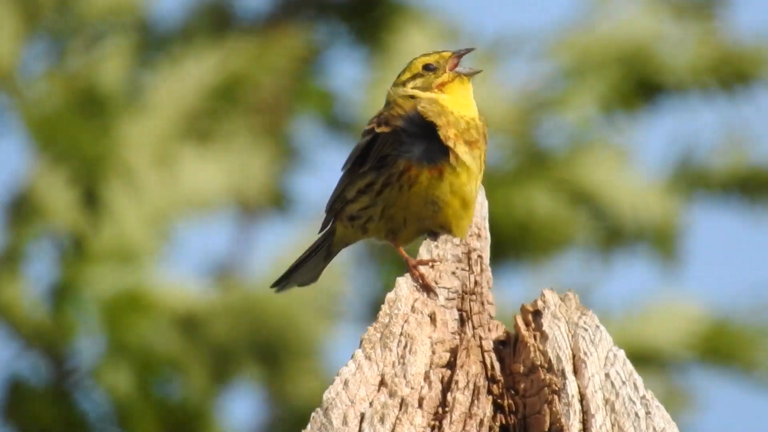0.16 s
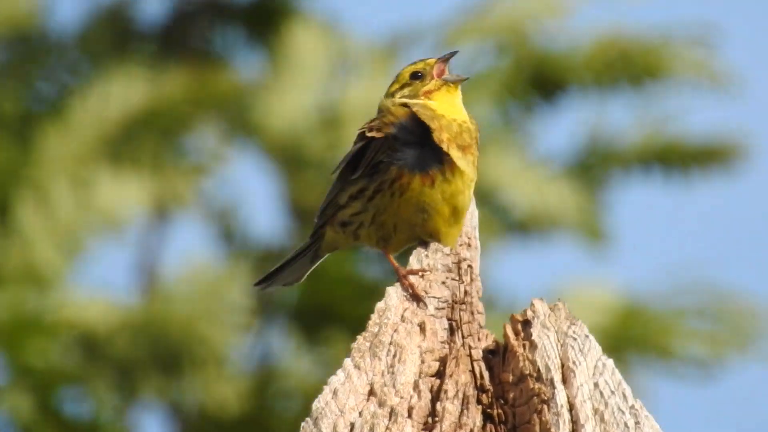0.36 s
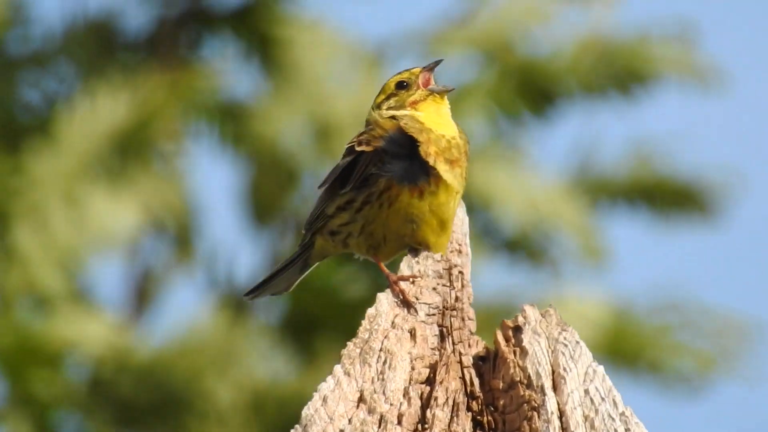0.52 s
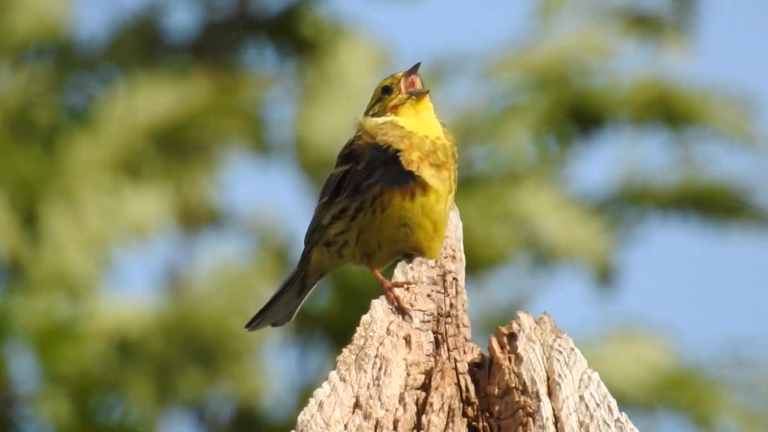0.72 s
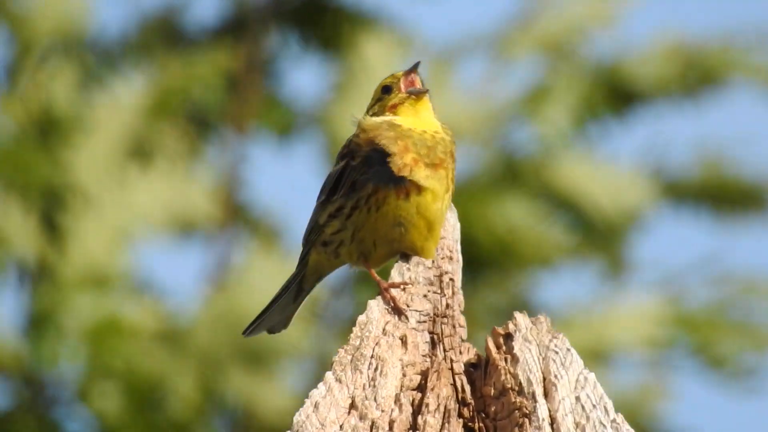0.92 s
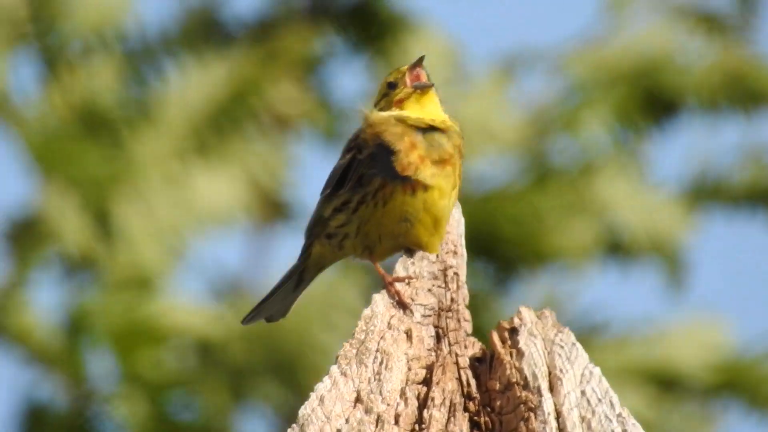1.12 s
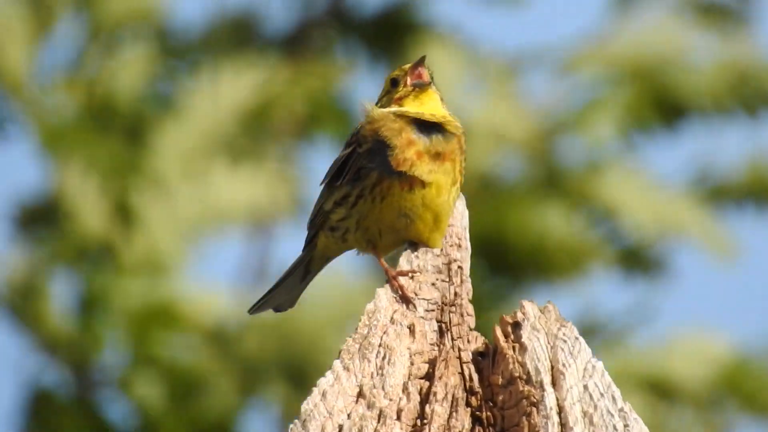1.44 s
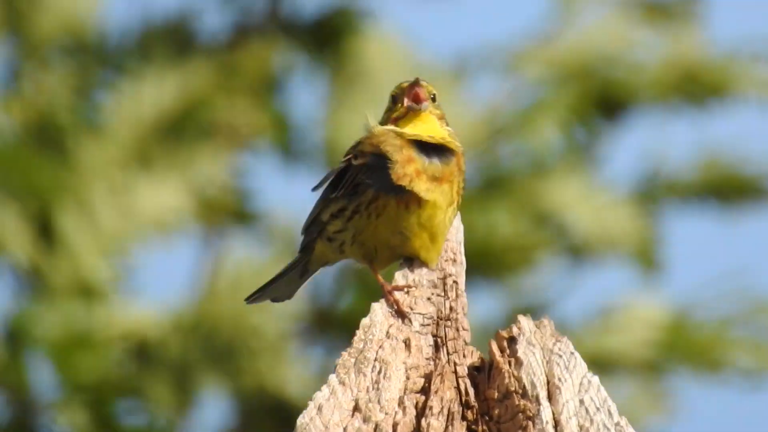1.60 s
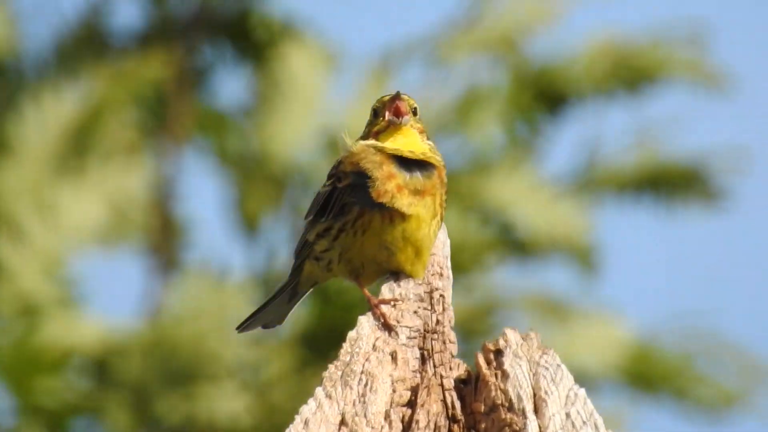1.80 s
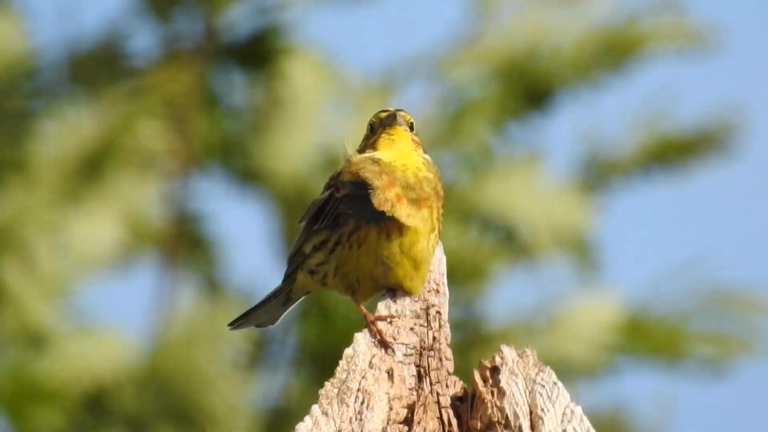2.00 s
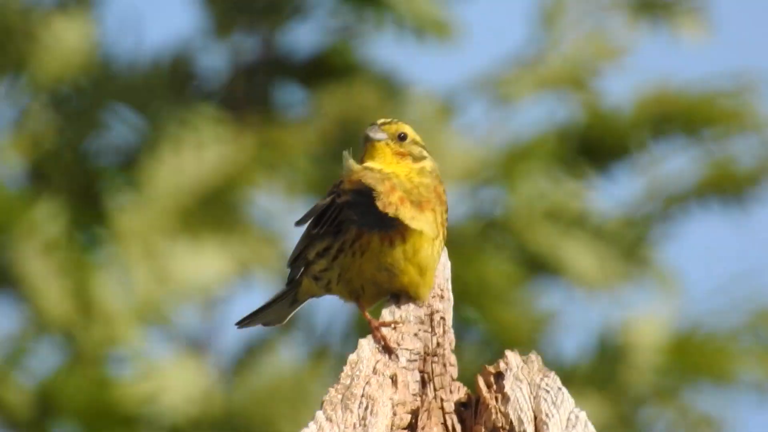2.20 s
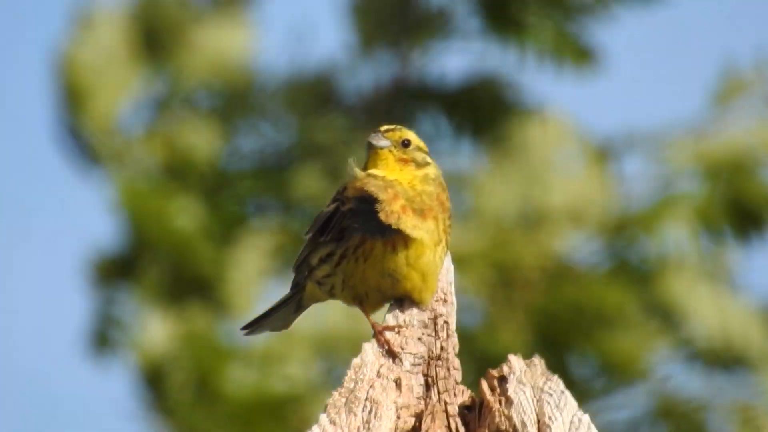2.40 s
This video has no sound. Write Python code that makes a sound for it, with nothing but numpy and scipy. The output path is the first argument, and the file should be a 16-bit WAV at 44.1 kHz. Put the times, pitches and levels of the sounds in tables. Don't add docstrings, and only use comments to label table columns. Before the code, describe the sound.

A bunting sings at once: eight pairs, one every 0.18 seconds, each a high fast rattle capped by a sharp chip, then a lower trill of upward flicks, swelling until about 1.4. From 1.46 to 2.0 a long buzz grows and sinks. Short echoes follow the notes. Behind lie breezy hum, throbbing crickets and low wind, easing then returning near 2.3; faint far chirps, mostly after 1.8.

```python
import sys
import numpy as np
from scipy import signal
from scipy.fft import rfft, irfft
from scipy.io import wavfile
from scipy.ndimage import uniform_filter1d, map_coordinates

SR = 44100
rng = np.random.default_rng(int(sys.argv[2]) if len(sys.argv) > 2 else 0)


def persist_wave(psi):
    counts = np.round(np.clip(psi, -1, 1) * 32767).astype(np.int16)
    wavfile.write(sys.argv[1], SR, np.atleast_2d(counts).T)


def natural_amplitude(level_db):
    exponent = np.asarray(level_db, float) / 20
    return 10 ** exponent


N = 112454
t = np.arange(N) / SR

# chip peak t/s, chip level/dB, rattle pitch f/Hz, rattle level over chip/dB
RATTLES = [
    (.006, -35.5, 6420, -25),
    (0.186, -36, 6550, -7),
    (0.374, -34, 6510, -1),
    (.554, -27.5, 6520, -7.5),
    (0.741, -27, 6495, -7.5),
    (0.923, -23, 6510, -11.5),
    (1.109, -25, 6560, -6.5),
    (1.296, -21, 6577, -8),
]


def level(x, db):
    return x * natural_amplitude(db) / np.sqrt(np.mean(x ** 2))


def band(x, hz, width_hz):
    f = np.arange(N // 2 + 1) * SR / N
    bell = np.exp(-.5 * ((f - hz) / width_hz * 2) ** 2)
    return irfft(rfft(x) * bell, N)


def noise(*shape):
    return rng.standard_normal((*shape, N))


def walk(rate_hz):
    return level(band(noise(), 0, rate_hz), 0)


def ramp(x, width):
    return np.sin(np.pi / 2 * np.clip(x / width, 0, 1)) ** 2


def whistle(hz, size, octave_db=-51):
    phase = 2 * np.pi * np.cumsum(hz) / SR
    return size * (np.sin(phase) + natural_amplitude(octave_db) * np.sin(2 * phase))


def countryside():
    # f/Hz, level per Hz/dB
    colour = np.array([(15, -47), (25, -36.5), (210, -3.5), (247, -4), (586, -14), (902, -8), (1350, -14),
                       (4200, -16.5), (15700, -28)])
    # f/Hz, left-right difference over the middle/dB
    spread = np.array([(60, -14.5), (110, -1.5), (200, -6), (380, -2.5), (700, -6.5), (1290, -4),
                       (2380, -1), (4400, -5), (8120, -0.5), (15000, -3.5)])
    read = lambda rows, hz: np.interp(np.log(hz), np.log(rows[:, 0]), rows[:, 1])
    out, swell = 0, walk(4.5)
    for hz in 25 * 2 ** np.arange(0, 9.6, .5):
        mid, side = band(noise(2), hz, hz * 0.51)
        flicker_db = (0.2 * swell + 2.3 * walk(15)) * min(900 / hz, 1)
        wide = natural_amplitude(read(spread, hz)) * side * np.array([[1], [-1]])
        out = out + natural_amplitude(read(colour, hz) + flicker_db) * (mid + wide)
    out = out * natural_amplitude(-56.5) / np.std(band(out.mean(axis=0), 1300, 4500))
    steady_hum = level(band(noise(), 881, 110), -70)
    return out + steady_hum


def wind():
    # t/s, level/dB
    gusts = [
        (0., -64),
        (.6, -68),
        (.75, -78.5),
        (2.1, -89),
        (2.3, -68),
        (2.55, -68),
    ]
    rumble = level(band(noise(2) + 0.27 * noise(), 58, 50), 0)
    return rumble * natural_amplitude(np.interp(t, *np.array(gusts).T) + 1.8 * walk(6))


def crickets():
    # t/s, level/dB
    chorus = [
        (0., -52.5),
        (.3, -55),
        (1.0, -56),
        (1.5, -52.5),
        (2.02, -52),
        (2.12, -51),
        (2.25, -63),
        (2.34, -55),
        (2.42, -51.5),
        (2.55, -64.5),
    ]
    pulse_hz = 33 * (1 + .15 * walk(10.4))
    throb = 3.3 + np.sin(2 * np.pi * np.cumsum(pulse_hz) / SR)
    throb = throb * natural_amplitude(1.6 * walk(44))
    wings = level(band(noise(2), 4910, 500) * throb, 0)
    return wings * natural_amplitude(np.interp(t, *np.array(chorus).T))


def rattles():
    length_s, warble_hz, swing_hz = 0.049, 239.3, 330
    chip_s, chip_up_hz, chip_rise_hz = 0.0039, 300, 566
    out = 0
    for at, db, hz, rel_db in RATTLES:
        u = t - at
        turn = 2 * np.pi * warble_hz * u + 0.28 * walk(60)
        swell_db = 9.5 * np.clip(u, -1, 0) / length_s
        size = natural_amplitude(db + rel_db + swell_db + 2.0 * walk(170))
        size = size * ramp(u + length_s, 0.015) * ramp(-u, 0.0026)
        size = size * (1 + .45 * np.cos(turn - 1.2))
        swing = swing_hz * ramp(u + length_s + 0.0059, .017) * np.sin(turn)
        out = out + whistle(hz + swing + 40 * walk(150), size)
        chip_hz = hz + chip_up_hz + chip_rise_hz * np.tanh(u / chip_s / 2)
        out = out + whistle(chip_hz, natural_amplitude(db) * np.exp(-.5 * (u / chip_s * 2.1) ** 2))
    return band(out, 6620, 1460)


def trills():
    # last flick t/s, time between flicks/s, level/dB, pitch f/Hz, upward sweep/Hz
    trill_rows = [
        (0.0936, 0.012, -34.5, 5275, 700),
        (0.2836, 0.012, -27.5, 5230, 620),
        (0.4683, .0128, -22.5, 5178, 520),
        (0.6548, 0.013, -20.5, 5154, 360),
        (0.8388, 0.012, -20, 5161, 338),
        (1.02, 0.013, -19.5, 5139, 280),
        (1.2085, .0124, -17.5, 5142, 330),
        (1.398, .0114, -24, 5125, 280),
    ]
    tick_dbs = (-93, -88, -46.5, -54, -50, -56.5, -75, -50.5)
    out = 0
    for (last, period, db, hz, sweep_hz), chip, tick_db in zip(trill_rows, RATTLES, tick_dbs):
        since = t - chip[0] - 0.0065
        cycle = ((t - last) / period + .5 + 0.039 * walk(25)) % 1
        swell_db = -27.5 * np.exp(-np.maximum(since, 0) / 0.022)
        last_db = -2 * ramp(t - last + period, period)
        size = natural_amplitude(db + swell_db + .9 * walk(60) + last_db)
        size = size * np.sin(np.pi * cycle) ** max(sweep_hz / 300, 1.05)
        size = size * ramp(since, 0.0021) * (t < last + period / 2)
        out = out + whistle(hz + sweep_hz * (cycle - .5) + 15 * walk(120), size)
        tick = np.exp(-.5 * ((t - last - period * 0.1) / 0.0014) ** 2)
        out = out + natural_amplitude(tick_db) * tick * level(band(noise(), 6260, 2300), 0)
    return out


def far_chirps():
    # start t/s, length/s, from f/Hz, to f/Hz, level/dB
    chirp_rows = [
        (0.235, 0.016, 3150, 3350, -67),
        (1.254, 0.04, 3100, 4160, -57.5),
        (1.831, 0.019, 3000, 3930, -49),
        (2.093, 0.011, 3100, 3720, -60),
        (2.115, 0.025, 3900, 3700, -56),
        (2.143, 0.0066, 4000, 4500, -51),
        (2.3, .025, 3800, 4530, -57),
        (2.312, 0.015, 3100, 3800, -55.5),
        (2.38, .032, 3100, 4540, -51),
        (2.41, .014, 3200, 3920, -54.5),
    ]
    out = 0
    for at, length, from_hz, to_hz, db in chirp_rows:
        u = np.clip((t - at) / length, 0, 1)
        out = out + whistle(from_hz + (to_hz - from_hz) * u, natural_amplitude(db) * np.sin(np.pi * u))
    return out


def buzz():
    # t/s, level/dB, middle pitch f/Hz, pitch swing/Hz
    course = [
        (1.465, -64, 6350, 150),
        (1.491, -49.5, 6520, 352),
        (1.549, -37.5, 6350, 485),
        (1.629, -38, 6150, 520),
        (1.72, -34.5, 5843, 456),
        (1.812, -33, 5734, 358),
        (1.861, -33.5, 5500, 300),
        (1.96, -30.5, 5444, 280),
        (1.998, -35, 5640, 300),
    ]
    # f/Hz, width/Hz, gain/dB
    fixed_bands = [(4800, 400, -9), (5295, 120, 9), (5520, 200, 4), (5850, 120, 5), (6130, 220, -6),
                   (6430, 240, 6)]
    times, db, hz, swing_hz = np.array(course).T
    read = lambda values: np.interp(t, times, values)
    turn = 2 * np.pi * np.cumsum(176 * (1 + 0.028 * walk(40))) / SR
    gate = ramp(t - times[0] + 0.0083, .01) * np.exp(-np.maximum(t - times[-1], 0) / 0.0038)
    shake = np.sin(turn) + 0.44 * np.sin(2 * turn + 0.47)
    pitch = read(hz) + read(swing_hz) * shake + 46.6 * walk(300)
    size = natural_amplitude(read(db) + 2 * walk(360)) * (1 + 0.42 * np.cos(turn + 1.97))
    voice = gate * whistle(pitch, size, octave_db=-42)
    return voice + sum((natural_amplitude(gain_db) - 1) * band(voice, f, width_hz) for f, width_hz, gain_db in fixed_bands)


def far_rumble():
    return level(band(noise(), 360, 59), -58) * np.exp(-((t - 1.513) / 0.11) ** 2)


def outdoors(song, pan_db):
    # delay/ms, left level/dB, right level/dB
    paths = [(0.3, 4.2, 2.6), (1.1, -16, -6.5), (5.2, -9, -4), (8.3, -18.5, 0), (13.5, -26, -15)]
    ear_lags = (0.00001, .00004)
    near = np.zeros((2, N))
    for ear in range(2):
        for k, path in enumerate(paths):
            delay_s = (path[0] - paths[0][0]) / 1000 + ear_lags[ear] * k
            late = map_coordinates(song, [(t - delay_s) * SR], mode="nearest")
            near[ear] += natural_amplitude(path[1 + ear]) * late
    tail = band(noise(2), 5360, 2200) * natural_amplitude(-60 * t / 0.19) * ramp(t, 0.014)
    tail = tail * natural_amplitude(-24) / np.sqrt(np.sum(tail ** 2) / 2)
    pan = natural_amplitude(np.array([[pan_db], [-pan_db]]) / 2)
    return near * pan + signal.fftconvolve(tail, song[None])[:, :N]


def scene():
    background = countryside() + wind() + crickets()
    bird = outdoors(rattles(), 0.5) + outdoors(trills(), 4.5) + outdoors(buzz(), -1)
    return background + bird + far_chirps() + far_rumble()


def band_limit(x):
    return signal.sosfilt(signal.butter(12, 15880, fs=SR, output="sos"), x)


def record(dry):
    loud = uniform_filter1d(band(dry[0], 4200, 1600) ** 2, int(0.09 * SR))
    loud = np.interp(t - .02, t, loud)
    share = loud / (loud + natural_amplitude(-33.5) ** 2)
    out = dry - (1 - natural_amplitude(-14 * share)) * band(dry, 2650, 955)
    early_db = -7 * share * (t < .88)
    out = out - (1 - natural_amplitude(early_db)) * band(out, 900, 2300)
    out = out - (1 - natural_amplitude(-4.5)) * band(out, 14000, 7000)
    return band_limit(out)


dry = scene()
out = record(dry)
persist_wave(out)
```